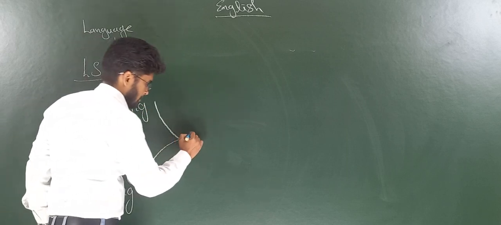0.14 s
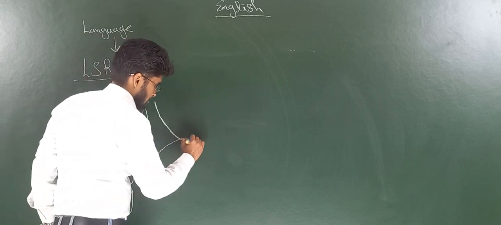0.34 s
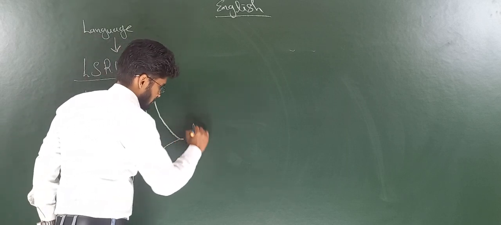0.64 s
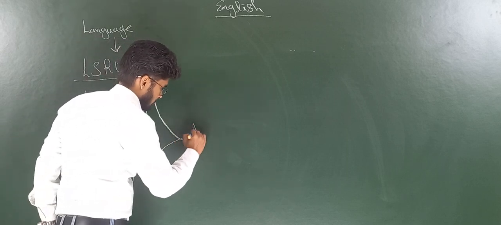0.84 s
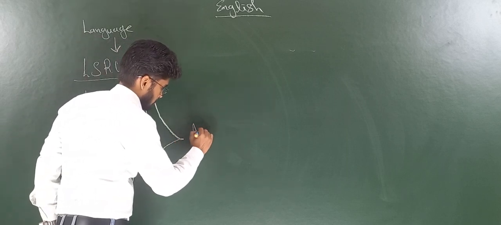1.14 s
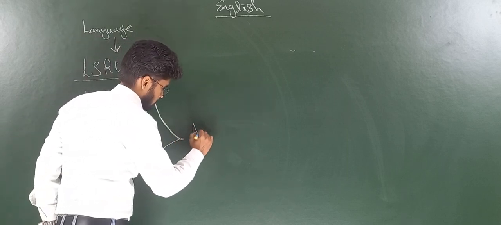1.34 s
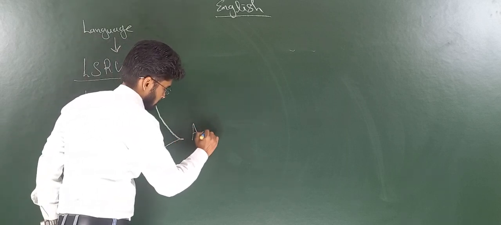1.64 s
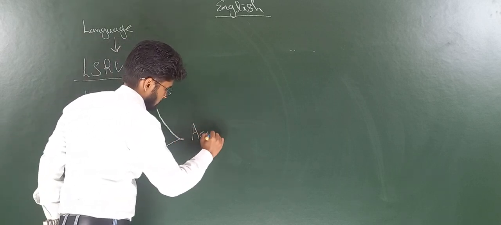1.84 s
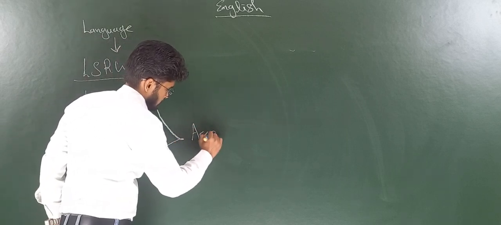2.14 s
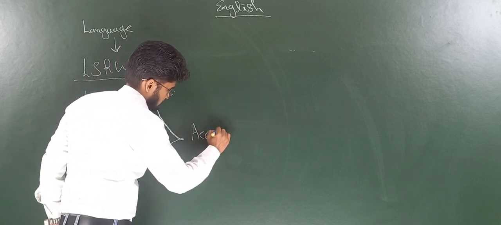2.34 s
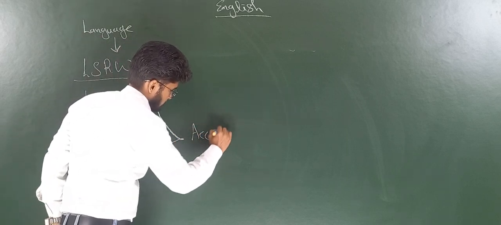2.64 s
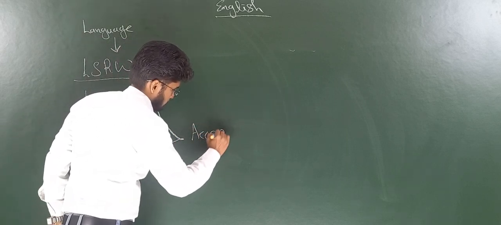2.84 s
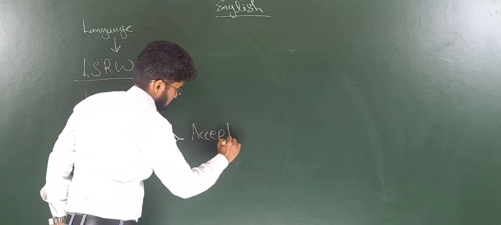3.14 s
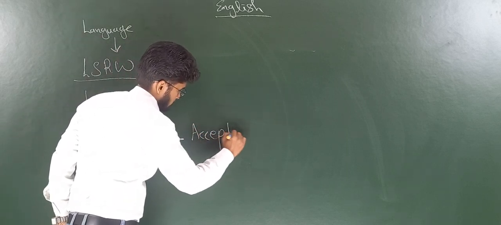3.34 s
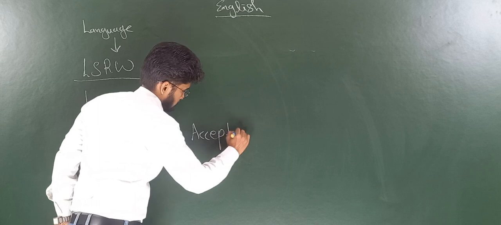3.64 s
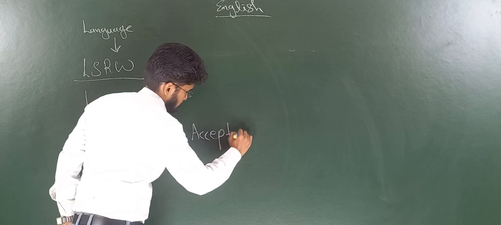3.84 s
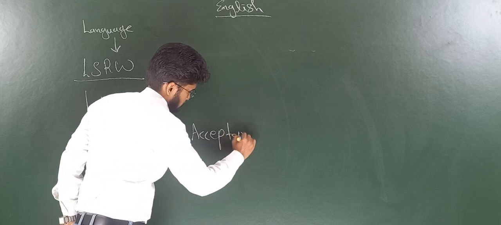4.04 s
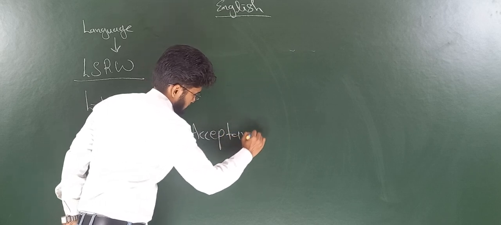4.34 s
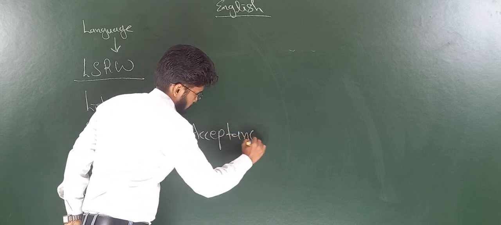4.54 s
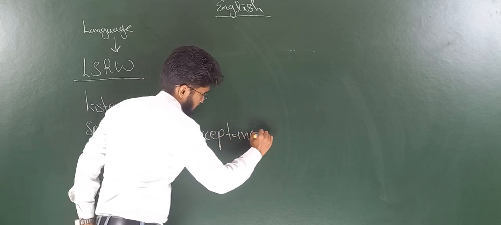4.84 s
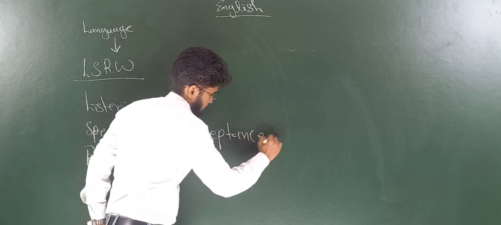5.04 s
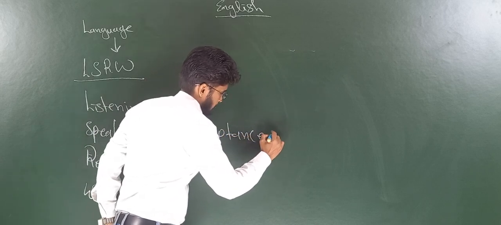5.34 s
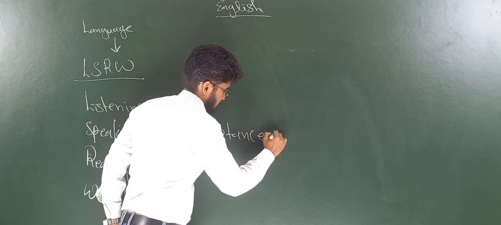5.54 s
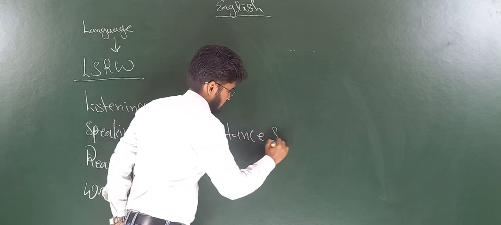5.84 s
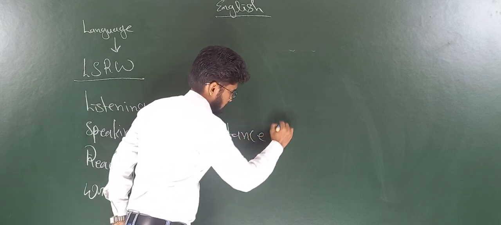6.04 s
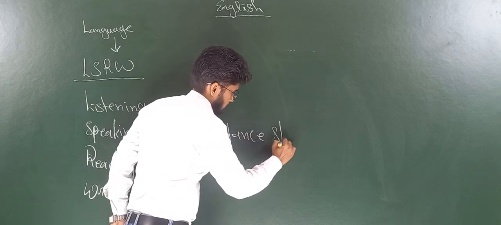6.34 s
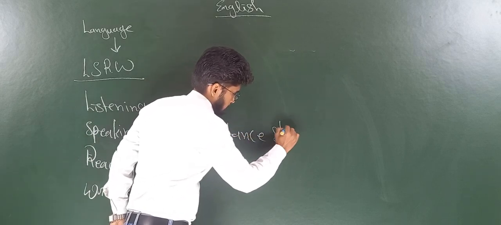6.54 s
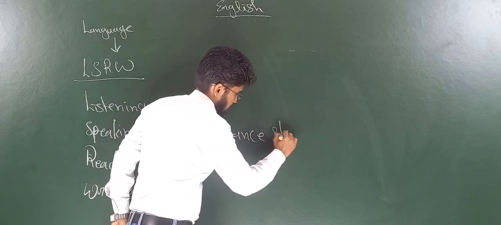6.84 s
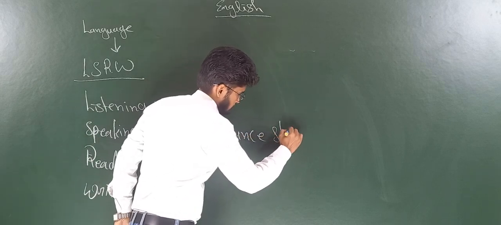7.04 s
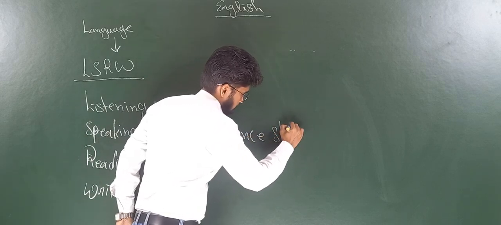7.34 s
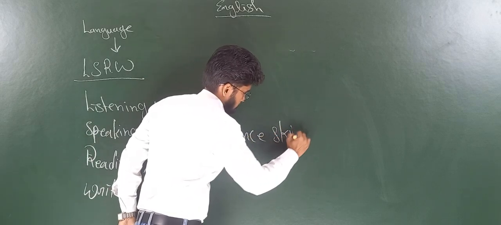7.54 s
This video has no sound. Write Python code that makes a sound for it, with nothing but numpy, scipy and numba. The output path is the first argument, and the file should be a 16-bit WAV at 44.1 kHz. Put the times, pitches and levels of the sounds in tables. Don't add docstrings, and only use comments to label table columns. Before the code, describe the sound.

Dry chalk taps and short gritty strokes on a classroom board, with small squeaks late on, over a low wavering room rumble.

```python
import sys
import numpy as np
from scipy import signal
from scipy.fft import rfft, irfft
from scipy.io import wavfile
from scipy.ndimage import uniform_filter1d
from numba import njit

SR = 44100
rng = np.random.default_rng(int(sys.argv[2]) if len(sys.argv) > 2 else 0)


def store_wav(level_fs):
    pcm = np.round(np.clip(np.atleast_2d(level_fs), -1, 1) * 32767)
    wavfile.write(sys.argv[1], SR, pcm.T.astype(np.int16))


def undo_db(level):
    steps = np.asarray(level, float) / 20
    return 10 ** steps


N = 339570

# t/s, peak level/dB, crack level/dB, panel f/Hz, panel ring level/dB
LANDINGS = [(0.396, -41.5, -19.5, 300, 4), (0.9026, -19, -30.5, 301, -6), (1.2974, -29.5, -28.5, 340, -2.5),
            (1.6299, -21.5, -26.5, 335, -6), (1.9359, -16, -25.5, 325, -15), (3.0195, -29.5, -18, 349, 2),
            (3.304, -24, -21, 349, -1), (3.9172, -18, -28, 366, -7), (4.4689, -15.5, -18, 333, -11),
            (4.6969, -28, -20, 431, 1), (5.4238, -55.5, -5.5, 366, -3.5), (5.6195, -33, -16, 349, 4),
            (6.1652, -18, -18.5, 530, -4.5), (6.678, -21.5, -21.5, 352, -12.5),
            (7.1292, -16, -21, 604, -19.5), (7.3818, -19.5, -24.5, 610, -11.5)]


def strikes(db):
    x = np.zeros(N)
    x[(np.array(LANDINGS)[:, 0] * SR).astype(int)] = undo_db(db)
    return x


def taps():
    t_s, peak_db, crack_db, panel_hz, ring_db = np.transpose(LANDINGS)
    direct = contact_push(t_s, peak_db, ring_db)
    crack = stick_crack(peak_db + crack_db)
    board = board_ring(t_s, peak_db, panel_hz, ring_db)
    return direct + crack + np.roll(board, 40)


def push_shape():
    t = (np.arange(int(.003 * SR)) / SR - .0011) / .00026
    return -(t + .12) * np.exp(.5 - .5 * t ** 2)


def contact_push(t_s, peak_db, ring_db):
    direct = np.convolve(strikes(peak_db + 2), push_shape())[26:N + 26]
    for when_s, db in zip(t_s, peak_db + 2 * ring_db - 0.5):
        add_tone(direct, when_s - .0003, db, hz=600, swell_s=.0005, t60_s=0.029)
    return direct


# f/Hz, level/dB
CRACK = [(800, -21), (2000, 4), (3300, 9), (5000, -6), (6500, 1), (9000, 3), (12000, -10), (16000, -0.5)]


def stick_crack(db):
    decay = np.exp(-np.arange(int(.02 * SR)) / SR / .0022)
    return np.convolve(strikes(db), decay)[:N] * level(colour(rng.standard_normal(N), CRACK))


# f/Hz, level at start/dB, level at end/dB, t60/s
THUMP = [(70, 0.5, -13, 0.38), (97.5, 0, 2, 0.35), (162, 3, 1.5, 0.19), (178.6, 4.5, -15, 0.25)]
BODY = [(305.6, -30, -6, 0.2), (266.3, -8, -13, 0.2), (353.6, 5, -10, 0.099), (361.2, -5, -8, 0.45),
        (410, 0, 7.5, 0.022), (461, 0.5, -1.5, 0.029), (481.6, -6, -7.5, 0.23), (544, 4.5, -4.5, 0.031),
        (670, -32, -12, 0.033), (681, -29, 8, 0.019), (742, 4.5, 8.5, 0.026), (764, -19, -37, 0.039)]
KNOCK = [(923, 0, -3.5, 0.048), (1077, 5, 1.5, 0.03), (1186, 9, 2.5, 0.017), (1429, 0.5, 0.5, 0.028),
         (1470, -2, 4, 0.016), (1716, -15, -5.5, 0.038), (1960, -8, -11, 0.012)]
# t/s, level/dB, panel f/Hz, swell/s, t60/s
JOLTS = [(2.249, -32.5, 375, 0.017, 0.23), (2.529, -44.5, 70, 0.031, 0.24), (2.5, -38, 390, 0.029, .1),
         (3.71, -49, 448, 0.0011, 0.034), (4.61, -30, 363, 0.011, 0.16), (4.835, -33, 400, 0.014, 0.13),
         (4.894, -31, 276, 0.0012, 0.062), (4.897, -32, 159.4, 0.0051, 0.15),
         (5.049, -32, 410, 0.0044, 0.12), (5.677, -25.5, 600, 0.0012, 0.037),
         (6.227, -19, 428.7, 0.00093, 0.04), (7.39, -37, 294, 0.0061, 0.37)]
# delay/s, level/dB
ECHOES = [(.0016, -9), (.0056, -4), (.0076, -3), (.0098, -8), (.0165, -9)]


def board_ring(t_s, peak_db, panel_hz, ring_db):
    thump_db = -50.5 + 12.5 * (t_s * SR / N) ** 1.5 + 0.2 * (peak_db + 24.5)
    board = modes(blow(np.minimum(thump_db, peak_db - 9)), THUMP)
    board += modes(blow(peak_db + ring_db - 6), BODY)
    board += modes(blow(peak_db - 21 - .6 * ring_db), KNOCK)
    dull = np.convolve(strikes(peak_db + ring_db + 7), push_shape())[:N]
    dull = band(dull, 540, 500)
    for delay_s, db in ECHOES:
        board += undo_db(db) * np.roll(dull, int(delay_s * SR) - 40)
    for when_s, db, hz in zip(t_s, peak_db + ring_db + 7.5, panel_hz):
        add_tone(board, when_s, db, hz, swell_s=.003, t60_s=.06)
    for jolt in JOLTS:
        add_tone(board, *jolt)
    return board


def blow(db):
    contact = signal.windows.hann(int(0.001 * SR))
    return np.convolve(strikes(db), contact / contact.sum())[:N]


def modes(force, table):
    out = np.zeros(N)
    for k, (hz, start_db, end_db, t60_s) in enumerate(table):
        r = np.exp(-np.log(1000) / (t60_s * SR))
        w = 2 * np.pi * hz / SR
        reach = (-1) ** k * np.linspace(undo_db(start_db), undo_db(end_db), N)
        out += signal.lfilter([0, r * np.sin(w)], [1, -2 * r * np.cos(w), r * r], force * reach)
    return out


def add_tone(out, t_s, db, hz, swell_s, t60_s):
    i = int(t_s * SR)
    t = np.arange(min(SR // 2, N - i)) / SR
    envelope = undo_db(db - 60 * t / t60_s) * (1 - np.exp(-(t / swell_s) ** 2))
    out[i:i + len(t)] += envelope * np.sin(2 * np.pi * hz * t)


def strokes():
    touch, drag, press = contact_level() * motion()
    bright = touch + 0.21 * (drag - touch)
    stick, grind = stick_and_grind()
    return bright * (grain_hiss() + stick) + drag * grind + board_rumble(press)


def contact_level():
    ramp = np.linspace(0, 1, 1800)
    lifted = signal.fftconvolve(strikes(np.zeros(len(LANDINGS))), ramp)[1800:N + 1800]
    contact = undo_db(-18 * np.append(lifted, 0)[:N])
    contact *= undo_db(1.1 * walk(70))
    contact *= undo_db(1.8 * walk(300))
    return contact


# t of top speed/s, speeding up/s, slowing down/s, hiss level/dB, pressure level/dB
FIRST_WORD = [(.535, 0.082, .1, -51.5, 13), (.7, 0.066, 0.12, -51, 7.5), (.955, 0.021, 0.031, -51, 11.5),
              (1.39, 0.048, 0.09, -52.5, 8.5), (1.48, 0.045, 0.032, -50.5, 4.5),
              (1.72, 0.053, 0.061, -55, 13.5), (1.81, 0.065, 0.036, -53.5, 11.5),
              (2.16, 0.19, 0.12, -55.5, 8), (2.24, .05, 0.13, -57, 14.5), (2.33, 0.066, 0.053, -53.5, 11),
              (2.5, 0.1, 0.063, -52, 7.5), (2.64, 0.08, 0.13, -53, 12.5), (2.81, 0.093, 0.12, -55.5, 9),
              (3.15, .09, 0.068, -49.5, 9.5), (3.37, 0.066, 0.056, -52, 11.5),
              (3.49, 0.076, 0.034, -59.5, 3), (3.598, 0.12, 0.082, -56.5, 10),
              (3.752, 0.058, 0.085, -57, 11.5), (4.01, 0.074, .06, -55.5, 14),
              (4.13, 0.062, 0.077, -56.5, 17.5), (4.28, 0.12, 0.1, -59, 7),
              (4.56, 0.14, 0.092, -51.5, 10.5), (4.76, 0.12, 0.28, -59, 8.5),
              (5.031, 0.26, 0.066, -49.5, 6)]
SECOND_WORD = [(5.68, 0.1, 0.14, -57, 18.9), (5.801, 0.041, 0.087, -47.5, 11.6),
               (5.93, 0.061, 0.053, -58.5, 13.5), (5.99, 0.024, 0.033, -55.5, 12),
               (6.07, 0.068, 0.12, -65.5, 10), (6.27, 0.078, 0.083, -48, 11.6),
               (6.34, .04, 0.036, -54.5, 10), (6.55, .12, 0.14, -64.5, 7.8), (6.74, 0.099, 0.12, -58, 21.1),
               (6.9, 0.088, 0.097, -56, 12.6), (7.2, 0.094, 0.062, -53.5, 20.5),
               (7.44, 0.023, .06, -58.5, 23), (7.52, .04, 0.058, -55.5, 13), (7.66, 0.11, 0.17, -49, 7.7)]


def motion():
    speed_power, trail_db, trail_s = 1.27, -16, 0.041
    skid_hiss_db, skid_press_db, skid_s = -35, -13, 0.042
    t = np.arange(N) / SR
    hiss, press = np.full(N, 1e-12), np.full(N, 1e-12)
    for t_s, rise_s, fall_s, db, press_db in FIRST_WORD + SECOND_WORD:
        i = slice(int((t_s - rise_s) * SR), int((t_s + fall_s + 8 * trail_s) * SR))
        late = t[i] - t_s
        speed = np.maximum(1 - (late / np.where(late < 0, rise_s, fall_s)) ** 2, 0)
        trail = undo_db(2 * trail_db) * np.exp(-2 * np.maximum(late - fall_s, 0) / trail_s)
        power = speed ** (2 * speed_power) + (late > 0) * trail
        hiss[i] += undo_db(2 * db) * power
        press[i] += undo_db(2 * (db + press_db)) * power
    landing_power = strikes(2 * np.array(LANDINGS)[:, 1])
    skid = signal.lfilter([1], [1, -np.exp(-2 / (skid_s * SR))], landing_power)
    drag = hiss + undo_db(2 * skid_hiss_db) * skid
    press = press + undo_db(2 * skid_press_db) * skid
    return np.sqrt(hiss), np.sqrt(drag), np.sqrt(press)


# f/Hz, level/dB
HISS = [(880, -15.5), (1500, -1), (2020, -15), (2160, -23.5), (2690, -27), (3250, -29), (4000, -17.5),
        (6760, -16), (8490, -15.5), (14800, -15.5), (16000, -3.5)]


def grain_hiss():
    hiss = level(colour(grains(1.5), HISS), -3)
    flutter = np.zeros(N)
    for hz in (1900, 2500, 3300, 4300, 5600, 7200, 9200, 11700, 14500):
        flutter += (undo_db(4 * walk(28)) - 1) * band(hiss, hz, hz / 4)
    return level(hiss + flutter, -3)


# t/s, squeak level/dB, low grind level/dB, squeak centre f/Hz
GRIP = [(.5, 2.5, -0.5, 8960), (.95, -1, -5, 9600), (1.45, -8, -7.5, 10100), (1.8, 0, -1.5, 8600),
        (2.2, -4.5, -1.5, 9000), (2.35, -5, -1, 8900), (2.65, 1.5, 1.5, 10100), (2.85, -1, -0.5, 8360),
        (3.2, 2.5, -1.5, 10200), (3.6, -2.5, -1.5, 8400), (4.05, -2, 0.5, 10200), (4.5, -3.5, 2, 8300),
        (5, -9.5, -5, 7900), (5.8, -1, 4, 8950), (6.25, -3.5, 0, 9050), (6.55, -8, 6.5, 8260),
        (6.9, -4.5, 0.5, 8850), (7.6, -0.5, -2.5, 8700)]
# ratio to centre, width/Hz, level/dB
STICK = [(.8, 500, -5), (.95, 600, 0), (1.06, 600, -1), (1.2, 1200, -4), (1.4, 2000, -5)]
# f/Hz, width/Hz, level/dB
GRIND = [(1935, 670, 5), (3116, 500, 1.5), (3720, 140, -5.5), (5620, 3300, -7.5)]


def stick_and_grind():
    t_s, *columns = np.transpose(GRIP)
    stick_db, grind_db, centre_hz = (np.interp(np.arange(N) / SR, t_s, c) for c in columns)
    patchy_db = 4
    stick, grind = np.zeros(N), np.zeros(N)
    for ratio, width_hz, db in STICK:
        ring = glide(grains(3.04), np.minimum(ratio * centre_hz, 15000), 1. * width_hz)
        stick += undo_db(db + patchy_db * walk(17)) * ring
    for hz, width_hz, db in GRIND:
        grind += undo_db(db + patchy_db * walk(20)) * band(grains(0.43), hz, width_hz)
    return undo_db(stick_db) * level(stick, -7.0), undo_db(grind_db) * level(grind, -5.5)


def board_rumble(press):
    force = grains(0.97) * press
    return undo_db(-32.0) * modes(force, BODY) + undo_db(-34.5) * modes(force, KNOCK) + undo_db(-64) * modes(force, THUMP)


def grains(spread_db):
    return level(rng.standard_normal(N) * undo_db(spread_db * np.minimum(rng.exponential(size=N), 6)))


@njit
def glide(x, hz, width):
    y, b, l = np.empty(len(x)), 0., 0.
    for i in range(len(x)):
        g, k = np.tan(np.pi * hz[i] / SR), width / hz[i]
        v = (b + g * (x[i] - l)) / (1 + g * (g + k))
        b, l, y[i] = 2 * v - b, l + 2 * g * v, k * v
    return y


# t of middle/s, length/s, f/Hz, level/dB
SQUEAKS = [(5.8, 0.082, 3200, -56), (5.795, 0.035, 1530, -41.5), (5.816, .02, 1100, -40),
           (5.79, .03, 8500, -58), (6.27, 0.044, 3520, -51.5), (6.298, 0.019, 3550, -50),
           (6.3, .02, 2500, -58), (6.29, .04, 8500, -63), (7.68, .05, 1150, -46), (7.63, .1, 3150, -63),
           (2.14, .09, 7100, -66), (2.6, .06, 9500, -60), (2.625, .07, 12000, -60), (2.6, .09, 8000, -63),
           (.6, .09, 1900, -65), (2.66, .09, 2250, -62), (5.424, 0.0071, 6300, -60),
           (5.425, .008, 990, -65)]


def squeaks():
    q, slip_spread_db = 12, 3
    out = np.zeros(N)
    for t_s, length_s, hz, db in SQUEAKS:
        start = int((t_s - length_s / 2) * SR)
        shape = signal.windows.hann(int(length_s * SR))[:N - start]
        slips = rng.standard_normal((SR // 4, 2))[:len(shape)]
        force = slips[:, 0] * undo_db(slip_spread_db * slips[:, 1])
        out[start:][:len(shape)] += shape * level(band(force, hz, hz / q), db)
    return out


# f/Hz, t60/s
ROOM = [(60, 0.58), (160, 0.77), (420, 0.84), (1100, 0.61), (1900, 0.72), (3000, 0.65), (9000, 0.2)]
# f/Hz, level/dB
ROOM_COLOUR = [(40, -17.5), (150, -2.5), (350, -7.5), (700, -2), (1500, -5.5), (1950, -17), (5000, -4),
               (15000, -33)]


def classroom(x):
    late = np.append(np.zeros(int(0.0068 * SR)), x)[:N]
    out = np.zeros(N)
    for hz in 50 * 2 ** np.arange(0, 8.3, 1 / 3):
        edges_hz = hz * 2 ** np.array([-1 / 6, 1 / 6])
        third = signal.butter(3, edges_hz, "band", fs=SR, output="sos")
        keep = np.exp(-2 * np.log(1000) / (read(ROOM, hz) * SR))
        stored = signal.lfilter([1 / (.05 * SR)], [1, -keep], signal.sosfilt(third, late) ** 2)
        diffuse = level(signal.sosfilt(third, rng.standard_normal(N)))
        out += undo_db(read(ROOM_COLOUR, hz)) * np.sqrt(stored) * diffuse
    return out


# f/Hz, level/dB
AIR = [(18, -60.5), (30, -35.5), (145, -6), (161, -16.5), (179, 0), (199, -10), (295, -12), (473, -26.5),
       (600, -24.5), (1070, -36), (3220, -44.5), (5040, -37), (7670, -37.5), (16000, -42)]


def floor():
    noise = colour(rng.standard_normal(N), AIR)
    low = signal.sosfilt(signal.butter(2, 700, fs=SR, output="sos"), noise)
    waver = undo_db(np.clip(5 * walk(7.6), -3, 3))
    return level(noise + low * (waver - 1), -59.5)


def level(x, db=0):
    return x * undo_db(db) / np.sqrt(np.mean(x ** 2))


def read(table, hz):
    f, value = np.transpose(table)
    return np.interp(np.log(np.maximum(hz, 1)), np.log(f), value)


def colour(x, table):
    return irfft(rfft(x) * undo_db(read(table, np.fft.rfftfreq(len(x), 1 / SR))), len(x))


def band(x, hz, width_hz):
    return signal.lfilter(*signal.iirpeak(hz, hz / width_hz, SR), x)


def walk(rate_hz):
    k = int(SR / rate_hz)
    held = np.repeat(rng.standard_normal(N // k + 1), k)
    return uniform_filter1d(uniform_filter1d(held, k), k)[:N]


def scene():
    chalk = taps() + strokes()
    return (chalk + squeaks() + classroom(chalk) + floor())[None]


def top_cut(x):
    return signal.sosfilt(signal.butter(12, 16610, fs=SR, output="sos"), x)


def record(dry):
    thin = signal.sosfilt(signal.butter(3, 50, "high", fs=SR, output="sos"), dry)
    cut = signal.sosfilt(signal.cheby2(14, 45, 16050, fs=SR, output="sos"), thin)
    return top_cut(cut)


dry = scene()
out = record(dry)
store_wav(out)
```